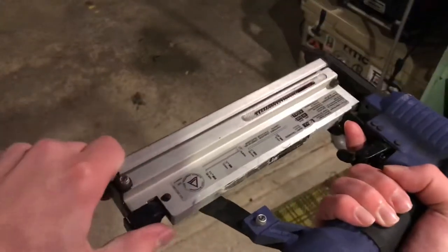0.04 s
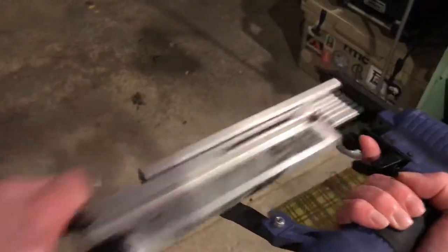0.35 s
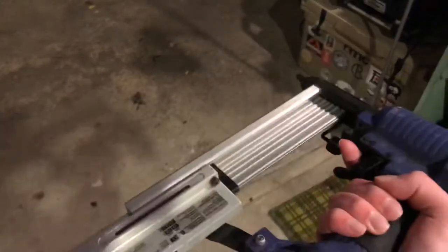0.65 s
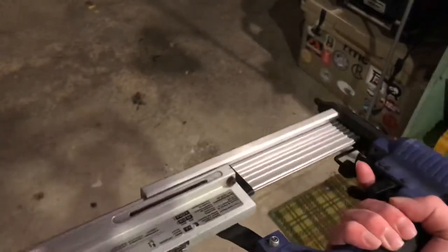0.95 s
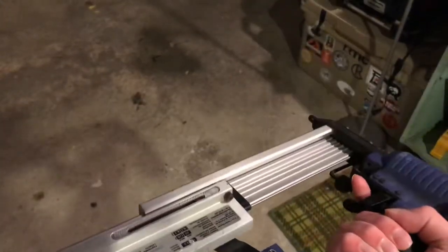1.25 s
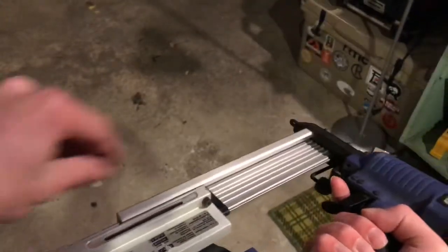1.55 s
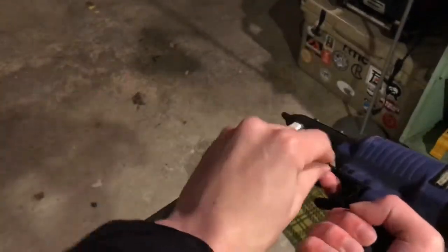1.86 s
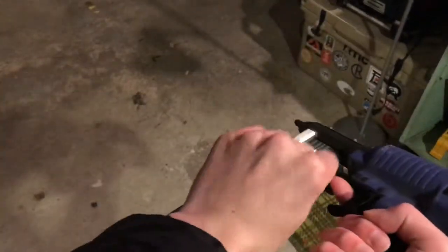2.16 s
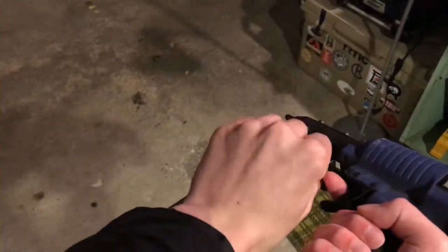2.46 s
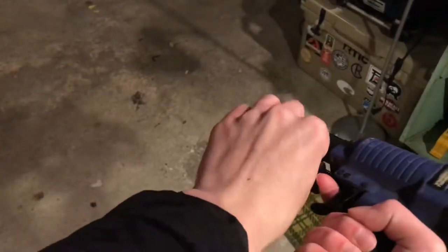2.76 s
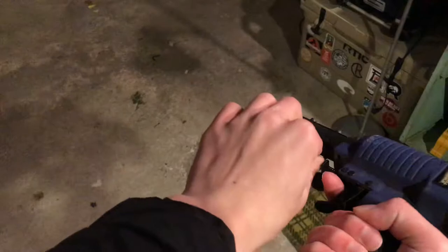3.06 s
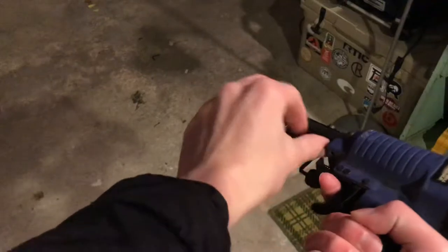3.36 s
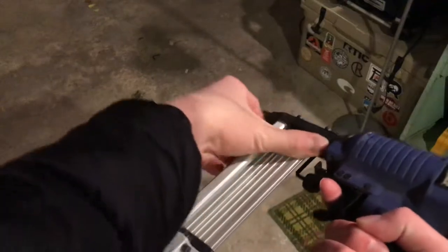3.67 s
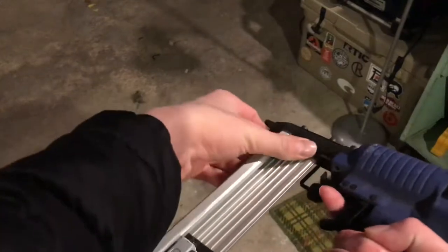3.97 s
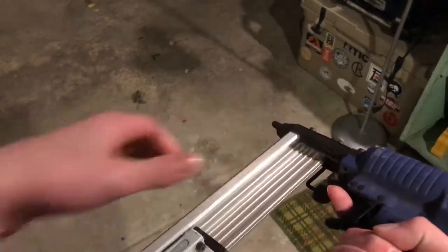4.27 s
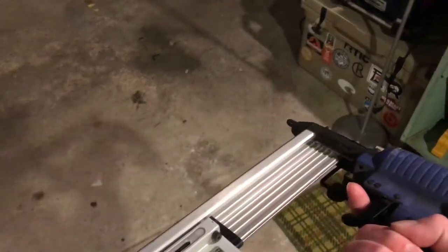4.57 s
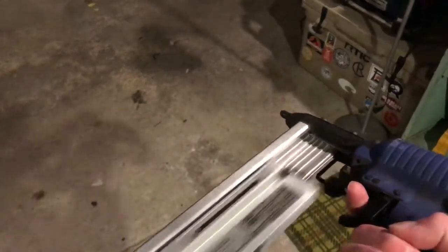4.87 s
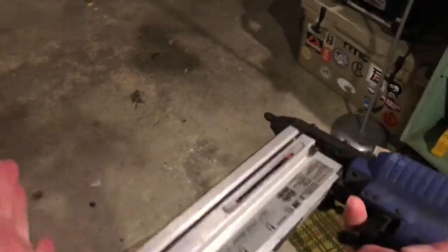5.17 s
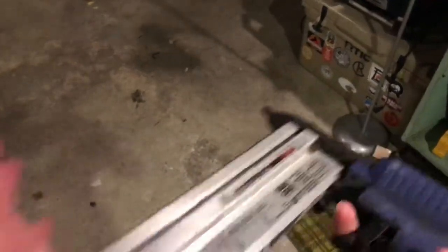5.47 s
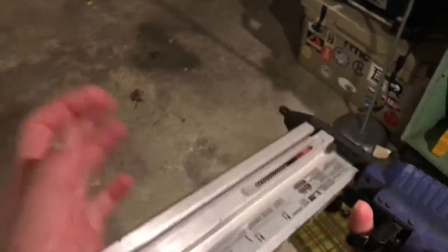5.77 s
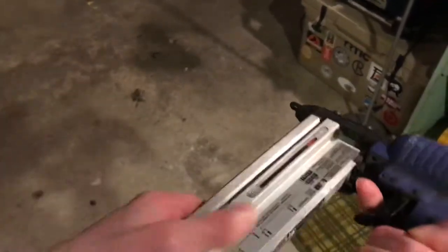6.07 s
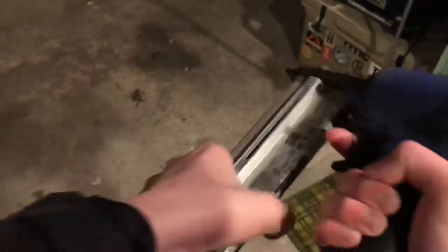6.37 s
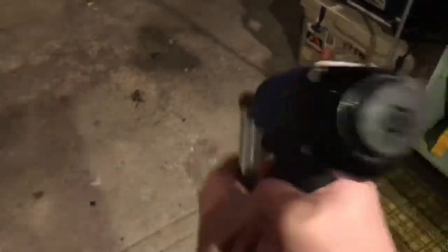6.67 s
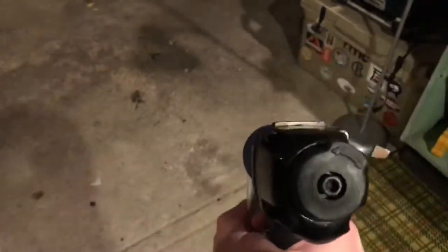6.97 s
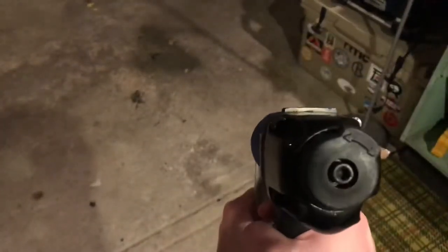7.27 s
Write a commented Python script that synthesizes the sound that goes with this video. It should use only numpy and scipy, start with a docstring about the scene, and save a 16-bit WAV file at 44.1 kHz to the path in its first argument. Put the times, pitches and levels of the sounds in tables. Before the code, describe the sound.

Close up in a concrete workshop, a nail gun's latch clacks and its aluminium magazine slides open with a brief scrape and rattle. A strip of nails ticks and scrapes into the channel while a sleeve rustles faintly. The cover is shoved home with loud metallic clacks and locks with a snap. Soft knocks follow as the plastic body is turned, over a low room rumble.

```python
"""A nail gun is loaded close by in a concrete workshop. The latch clacks and the aluminium magazine
slides open; a sleeve rustles while a strip of nails ticks and scrapes into the channel; the cover is
shoved home and locks with a snap, and the plastic body knocks as the gun is turned round. Impacts and
friction excite the resonances of rail, steel edges, housing and hollow channel; the channel rings
higher the further it stands open. Under it all lies a low room rumble."""
import sys
import numpy as np
from scipy import signal
from scipy.fft import rfft, irfft, next_fast_len
from scipy.io import wavfile
from scipy.ndimage import uniform_filter1d, map_coordinates

SR = 44100
rng = np.random.default_rng(int(sys.argv[2]) if len(sys.argv) > 2 else 0)


def to_wav(s):
    """Save 16-bit WAV."""
    ch = np.atleast_2d(s).T  # columns
    pcm = np.round(np.clip(ch, -1, 1) * 32767)  # PCM
    wavfile.write(sys.argv[1], SR, pcm.astype(np.int16))


N = 327222
HIT_SIZE = 4096  # samples in a contact force or a filter's impulse response
SHUT_HZ, OPEN_HZ = 969, 1524  # the channel's note at the two ends of the cover's travel

# Hard blows of latch and cover: (time [s], delay of seating [s], chatter [s], strike note [Hz],
# base between rail modes [dB], seating gain [dB], channel [dB], rail [dB], edge [dB], thump [dB],
# ring [dB])
HARD_BLOWS = [(.008, .005, .0026, 1222, -4, -1.5, -24.5, -30, -32.5, -56.5, -56),
              (0.293, .0037, 0.0015, 1094, -16.5, 1, -20.5, -22.5, -39.5, -70.5, -52),
              (4.761, .0085, 0.0092, 1553, -3.5, 0, -15.5, -17, -22, -34, -50),
              (4.8954, .004, 0.0044, 1520, -7, -1, -12.5, -12.5, -20, -48.5, -41),
              (5.4016, .0065, 0.0027, 1397, 2.5, -4.5, -19.5, -13.5, -20.5, -31.5, -57)]
# Spectral envelope of the gun's hollow parts: (frequency [Hz], gain [dB])
CAVITY_SPECTRUM = [(250, -30), (620, -13), (900, -8), (1900, 3.5), (4000, -25), (12000, -42)]


def amp(db):
    """Decibels to amplitude ratio."""
    return 10 ** (np.asarray(db) / 20)


def unit(x):
    """Scale to rms 1."""
    return x / np.sqrt(np.mean(x ** 2) + 1e-20)


def dose(x, db):
    """Give a transient the energy of 10 ms at this level."""
    return amp(db) * x / np.sqrt(np.sum(x ** 2) / (SR / 100) + 1e-20)


def along(points, hz):
    """Interpolate (frequency [Hz], value) points on a logarithmic frequency axis."""
    freqs, values = np.transpose(points)
    return np.interp(np.log(hz + 1), np.log(freqs + 1), values)


def add(track, s, sound):
    """Superpose a sound on a track from time s."""
    part = track[max(round(s * SR), 0):][:len(sound)]
    part += sound[:len(part)]


def wobble(rate):
    """A smooth random curve with rate knots a second."""
    return map_coordinates(rng.standard_normal(int(N * rate / SR) + 4), [np.arange(N) * rate / SR])


def coloured(x, gain):
    """Minimum-phase filter: folding the cepstrum makes the given gain curve causal."""
    size = 2 * HIT_SIZE
    cepstrum = irfft(np.log(np.maximum(gain(np.fft.rfftfreq(size, 1 / SR)), 1e-6)))
    cepstrum[1:size // 2] *= 2
    cepstrum[size // 2 + 1:] = 0
    return signal.fftconvolve(x, irfft(np.exp(rfft(cepstrum)))[:HIT_SIZE])[:len(x)]


def shaped(x, spectrum):
    """Filter by a spectral envelope of (frequency [Hz], gain [dB]) points."""
    return coloured(x, lambda hz: amp(along(spectrum, hz)))


def peaks(modes, hz, base_db):
    """Lorentzian resonances (frequency [Hz], bandwidth [Hz], gain [dB]) add in power to a flat base."""
    power = sum(amp(db) ** 2 / (1 + (2 * (hz - centre) / width) ** 2) for centre, width, db in modes)
    return np.sqrt(amp(base_db) ** 2 + power)


def grit(size, spread_db):
    """Dense micro-impacts: noise in grains of log-normal strength."""
    noise = rng.standard_normal(size)
    grains = np.repeat(rng.standard_normal(size // 16 + 1), 16)[:size]
    return unit(noise * amp(spread_db * grains))


def background():
    """Ambient noise: a low rumble with a little hiss, whose level dips briefly at the last snap."""
    spectrum = [(20, -17), (65, 1.5), (200, -5), (310, -5), (550, -16), (1400, -23.5), (2800, -25),
                (16000, -33.5)]  # room noise: (frequency [Hz], gain [dB])
    level_db, dip_db = -64.5, -9.5
    dip_start_s, hold_s, recovery_s = 5.38, .26, .52
    air = unit(shaped(rng.standard_normal(N), spectrum))
    age = np.arange(N) / SR - dip_start_s
    dip = np.clip(age / .1, 0, 1) * np.exp(-np.maximum(age - hold_s, 0) / recovery_s)
    return amp(level_db + dip_db * dip) * air


def chatter(length, t60, fade_db=4):
    """Contact force of two parts that rebound and settle; its flattened spectrum has no pitch."""
    t = np.arange(HIT_SIZE) / SR
    length = max(length, 1e-4)
    envelope = amp(-fade_db * np.minimum(t / length, 1) - 60 * np.maximum(t - length, 0) / t60)
    force = grit(HIT_SIZE, spread_db=2) * envelope
    power = np.abs(uniform_filter1d(np.abs(rfft(force, 2 * HIT_SIZE)) ** 2, size=40))
    return coloured(force, lambda hz: 1 / np.sqrt(power + 1e-12))


def channel(force, modes):
    """Cavity resonance of the air and walls of the nail channel."""
    return coloured(force, lambda hz: amp(along(CAVITY_SPECTRUM, hz)) * peaks(modes, hz, base_db=-33.5))


def channel_note(s):
    """The channel's resonant frequency [Hz] at time s rises with the cover's opening."""
    travel = [(.25, 0), (.293, .15), (.35, .3), (.385, .6), (.415, 0.96), (4.77, 1), (4.8, .52), (4.85, .2),
              (4.895, 0)]  # position of the cover: (time [s], opening [0-1])
    return SHUT_HZ + (OPEN_HZ - SHUT_HZ) * np.interp(s, *np.transpose(travel))


def rail(force, contact_hz, focus_db, base_db=-2.5):
    """Modal response of the aluminium rail; the contact's hardness weights the band at contact_hz."""
    modes = [(2200, 110, -5), (3096, 200, -0.5), (3930, 150, -0.5)]  # rail resonances: (frequency [Hz], bandwidth [Hz], gain [dB])
    spectrum = [(400, -34.5), (1000, -11), (1900, 1.5), (3100, -0.5), (4600, -2.5), (6300, -8.5),
                (10000, -31.5)]  # their envelope: (frequency [Hz], gain [dB])
    focus = lambda hz: amp(focus_db * np.exp(-7 * np.log2((hz + 1) / contact_hz) ** 2))
    return coloured(force, lambda hz: amp(along(spectrum, hz)) * peaks(modes, hz, base_db) * focus(hz))


def edge(force, base_db):
    """The high modes of thin steel edges and nails give a bright click."""
    modes = [(6370, 82, -4.5), (7800, 37, -5), (8590, 93, 1.5), (11450, 80, -1.5), (12690, 300, -6)]  # steel resonances: (frequency [Hz], bandwidth [Hz], gain [dB])
    spectrum = [(2000, -43), (4600, -18.5), (6200, 2.5), (8800, -1.5), (10200, -3), (11500, -2.5)]  # their envelope: (frequency [Hz], gain [dB])
    return coloured(force, lambda hz: amp(along(spectrum, hz)) * peaks(modes, hz, base_db))


def buzz(t60, base_db):
    """Nails and spring shiver against the rail, driving the steel modes with decaying noise."""
    t = np.arange(SR // 2) / SR
    return edge(rng.standard_normal(len(t)) * amp(-60 * t / t60), base_db)


def blow(length, channel_hz, base_db, channel_db, rail_db, edge_db, thump_db):
    """Impact excitation: one force drives channel, rail, edges and body; loose parts rattle on."""
    thump_spectrum = [(40, -23.5), (200, -15), (290, -8.5), (390, 0), (520, -7), (680, 6), (2500, -47)]  # response of the whole gun: (frequency [Hz], gain [dB])
    shiver_t60 = .35  # s
    out = np.zeros(SR)
    force = chatter(length, t60=.026, fade_db=6)
    add(out, 0, dose(channel(force, [(channel_hz, 110, 0)]), channel_db - 3.5))
    add(out, 0, dose(rail(force, 3200, focus_db=1.5, base_db=base_db), rail_db))
    add(out, 0, dose(edge(force, base_db=-.5), edge_db))
    add(out, 0, dose(shaped(force, thump_spectrum), thump_db))
    add(out, 0, dose(buzz(t60=.2, base_db=-2.5), edge_db - 10))
    shiver = grit(SR, spread_db=1.5) * amp(-60 * np.arange(SR) / SR / shiver_t60)
    return out + dose(rail(shiver, 5000, focus_db=4, base_db=9), rail_db - 16.5)


def ringing(db):
    """Free decay of channel and rail; loose contact broadens each mode by a random walk of phase."""
    modes = [(914, -4.5, .7), (965, 0.5, 0.46), (1505, -11, .7), (2170, -0.5, .55), (4190, -9, 0.81)]  # lightly damped modes: (frequency [Hz], relative level [dB], t60 [s])
    linewidth_hz = 30
    t = np.arange(SR) / SR
    ring = np.zeros(SR)
    for hz, mode_db, t60 in modes:
        envelope = amp(mode_db + rng.normal(0, 2) - 60 * t / t60)
        phase = 2 * np.pi * (hz * t + rng.random())
        drift = np.cumsum(rng.standard_normal(SR)) * np.sqrt(2 * np.pi * linewidth_hz / SR)
        ring += envelope * np.sin(phase + drift)
    return amp(db) * ring * (1 - np.exp(-t / .0033))


def clacks():
    """Double impact: latch or cover strikes its stop brightly, seats milliseconds later and rings on."""
    out = np.zeros(N)
    for s, gap, length, strike_hz, base_db, seat_db, *levels in HARD_BLOWS:
        channel_db, rail_db, edge_db, thump_db, ring_db = levels
        strike = blow(length, strike_hz, base_db, channel_db - 2, rail_db - 1.5, edge_db + 2.5, thump_db)
        seating = blow(length, channel_note(s), base_db, channel_db - 3.5, rail_db, edge_db, thump_db)
        add(out, s, strike)
        add(out, s + gap, amp(seat_db) * seating)
        add(out, s + gap, ringing(ring_db))
    return out


def driven_mode(hz, drive_s, t60):
    """A damped oscillator builds up while it is driven, then decays exponentially."""
    t = np.arange(HIT_SIZE) / SR
    decay = amp(-60 * np.maximum(t - drive_s, 0) / t60)
    return np.sin(2 * np.pi * hz * t) * np.minimum(t / drive_s, 1) * decay


def seating_notes():
    """Direct radiation of the channel's main mode as the cover seats."""
    out = np.zeros(N)
    for s, gap, length, _, _, seat_db, channel_db, *_ in HARD_BLOWS:
        note = driven_mode(channel_note(s), length, t60=.028)
        add(out, s + gap, dose(note, channel_db + seat_db - 2.5))
    return out


def slide(stroke, rail_db, edge_db, channel_db, overtone_db):
    """Sliding friction, brighter with effort; the channel's resonance glides as its length changes."""
    bandwidth_hz, overtone_ratios = 85, (1.92, 2.55)
    t = np.arange(stroke[0][0], stroke[-1][0] + .01, 1 / SR)
    level_db = np.interp(t, *np.transpose(stroke))
    phase = 2 * np.pi * np.cumsum(channel_note(t)) / SR
    pole = np.exp(-np.pi * bandwidth_hz / SR)
    friction = lambda: grit(SR, spread_db=4)[:len(t)]

    def resonance(ratio):
        """Narrow-band noise centred on a multiple of the channel's note."""
        baseband = signal.lfilter([1], [1, -pole], friction() + 1j * friction())
        return unit(np.real(baseband * np.exp(1j * ratio * phase)))

    air = amp(channel_db) * unit(shaped(resonance(1), CAVITY_SPECTRUM))
    force = friction()
    brightness = amp(edge_db + .3 * (level_db + 33))  # the edges gain 0.3 dB extra per dB of friction
    rub = amp(rail_db) * unit(rail(force, 3300, focus_db=3)) + brightness * unit(edge(force, base_db=-1))
    envelope = amp(level_db + wobble(130)[:len(t)])
    overtones = amp(overtone_db) * sum(resonance(ratio) for ratio in overtone_ratios)
    out = np.zeros(N)
    add(out, t[0], envelope * (rub + air + overtones))
    return out


def cover_slides():
    """Friction of the cover on its rail, drawn open and later shoved home."""
    # friction during each stroke: (time [s], level [dB])
    open_stroke = [(.25, -54), (.29, -42), (0.315, -33.5), (0.323, -37.5), (0.385, -27.5), (0.419, -33),
                   (0.51, -59)]
    shut_stroke = [(4.78, -18.5), (4.794, -28.5), (4.888, -32.5)]
    opening = slide(open_stroke, rail_db=-5, edge_db=-3.5, channel_db=-6, overtone_db=-9.5)
    closing = slide(shut_stroke, rail_db=-5.5, edge_db=-6, channel_db=-8, overtone_db=-10.5)
    return opening + closing


def ping(force, hz, width_hz):
    """The local resonance of the spot being touched."""
    return coloured(force, lambda freqs: peaks([(hz, width_hz, 0)], freqs, base_db=-40) ** 2)


def tick(length, channel_hz, ping_hz, channel_db, rail_db, ping_db, edge_db):
    """A light impact excites channel, rail, edges and the resonance of the spot it touches."""
    out = np.zeros(SR // 2)
    force = chatter(length, t60=.02)
    cavity = channel(force, [(970, 40, -9), (channel_hz, 95, 0), (channel_hz, 600, -10)])
    add(out, 0, dose(cavity, channel_db))
    add(out, 0, dose(rail(force, ping_hz, focus_db=5.5), rail_db))
    add(out, 0, dose(edge(force, base_db=-5), edge_db))
    add(out, 0, dose(ping(chatter(length, t60=.012), ping_hz, width_hz=420), ping_db))
    return out + dose(buzz(t60=.15, base_db=-6.5), edge_db - 9)


def rattles():
    """Loose cover and latch touch the channel; the point of contact selects the modes that sound."""
    # light contacts: (time [s], chatter [s], channel note [Hz], ping [Hz], level [dB],
    # ping level [dB], brightness [dB])
    contacts = [(.2654, .002, 1470, 3980, -50, -54, -4.5), (.534, 0.0012, 1900, 4430, -38, -53, -.5),
                (.565, 0.0069, 1530, 3650, -40.5, -57, -40), (.5864, 0.0043, 1336, 1950, -33.5, -35, -10.5),
                (.642, .0007, 1620, 2680, -41, -41.5, -22), (.729, .004, 1660, 3370, -51.5, -51.5, -16),
                (.896, 0.013, 1570, 1700, -46, -45, -7), (.913, 0.0022, 1400, 3530, -43.5, -52, -12),
                (.9224, 0.004, 1460, 1630, -35, -35, -8.5), (3.6632, 0.0029, 2640, 4350, -43, -40, -2),
                (3.8549, .003, 2160, 4600, -50, -54, -3.5), (4.755, .003, 1484, 3590, -30, -40, -0.5),
                (5.38, .002, 1960, 2380, -38, -43, 0), (5.392, 0.007, 1286, 3130, -33.5, -43.5, -4.5),
                (5.61, .057, 1800, 4790, -56.5, -63, -9), (6.597, .003, 1750, 2450, -40.5, -41, -12.5),
                (6.628, .008, 2202, 3900, -44.5, -45, 1.5)]
    out = np.zeros(N)
    for s, length, hz, ping_hz, db, ping_db, bright_db in contacts:
        channel_db = db - 2 - .18 * bright_db
        rail_db = db - 1.5 + .25 * bright_db
        add(out, s, tick(length, hz, ping_hz, channel_db, rail_db, ping_db, edge_db=db + bright_db))
    return out


def movements(rows, attack_s=.16, t60=.72):
    """Envelopes of movements, and of a steady hiss, rise, hold and decay; being incoherent, they add in power."""
    t = np.arange(N) / SR
    power = np.zeros(N)
    for s, length, db in rows:
        rise = np.clip((t - s) / attack_s, 0, 1)
        power += (rise * amp(db - 60 * np.clip((t - s - length) / t60, 0, 2))) ** 2
    return np.sqrt(power)


def housing(force):
    """The damped modes of the plastic housing give a dull tone."""
    modes = [(820, 140, 4.5), (950, 69, 5.5), (1440, 350, -10.5)]  # housing resonances: (frequency [Hz], bandwidth [Hz], gain [dB])
    return coloured(force, lambda hz: peaks(modes, hz, base_db=-53) * amp(along(CAVITY_SPECTRUM, hz)))


def handling():
    """Friction noise of the sleeve and of the palm on the housing, over a faint steady hiss; a low rumble as
    the gun sways."""
    cloth_spectrum = [(290, -28), (500, -8.5), (1100, -7), (4150, -8), (5300, -12), (15000, -17.5)]  # rustling fabric: (frequency [Hz], gain [dB])
    # movements of arm, palm and the gun's weight, plus one long row of steady faint hiss that fades out at
    # about the last snap: (time [s], duration [s], level [dB])
    rustles = [(.68, .27, -65.5), (.9, 4.3, -69.5), (1.3, 0.61, -66.5), (3.2, 0.53, -63.5),
               (3.95, 0.36, -61.5), (4.35, 0.29, -65), (5.2, 0.251, -64.5), (5.86, 0.41, -62),
               (6.2, 0.47, -59.5)]
    rubs = [(3.45, 0.25, -66.5), (3.93, 0.089, -64), (4.27, 0.23, -59), (4.64, .12, -55), (5.9, 0.28, -69)]
    sway = (3.6, 0.94, -65)
    cloth = unit(shaped(grit(N, spread_db=3), cloth_spectrum))
    palm = unit(housing(grit(N, spread_db=3)))
    low_band = signal.butter(2, [42, 110], "bandpass", fs=SR, output="sos")
    rumble = unit(signal.sosfilt(low_band, rng.standard_normal(N)))
    sleeve = movements(rustles) * amp(wobble(25)) * cloth
    grip = movements(rubs) * amp(wobble(43)) * palm
    return sleeve + grip + movements([sway]) * rumble


def strip_scrapes():
    """Stick-slip friction of the nail strip: the channel gives one note, the contact a shifting rasp."""
    pushes = [(1.895, 0.017, -54.5, 2980), (2.026, .02, -57.5, 3430), (2.126, 0.039, -50, 5460),
              (2.157, 0.022, -46.5, 4400), (2.616, 0.047, -53, 3580), (2.966, 0.091, -57.5, 5200),
              (3.269, 0.034, -54.5, 4720)]  # drags along the groove: (time [s], duration [s], level [dB], rasp [Hz])
    attack_s, t60 = .014, .22
    out = np.zeros(N)
    t = np.arange(SR // 2) / SR
    for s, length, db, rasp_hz in pushes:
        force = grit(len(t), spread_db=3.5)
        note = unit(channel(force, [(1510, 53, 5.5), (1640, 160, -5)]))
        rasp = amp(-9) * unit(rail(force, rasp_hz, focus_db=-4))
        rasp += amp(-14) * unit(ping(force, rasp_hz, width_hz=700))
        rasp += amp(-13.5) * unit(edge(force, base_db=-13))
        envelope = np.minimum(t / attack_s, 1) * amp(db - 60 * np.maximum(t - length, 0) / t60)
        add(out, s, envelope * (note + rasp))
    return out * amp(1.2 * wobble(70))


def strip_taps():
    """Impacts of the nail strip on the open channel; harder contacts excite more of the rail."""
    # taps of the strip: (time [s], chatter [s], ping [Hz], level [dB], brightness [dB])
    taps = [(1.897, .026, 2980, -44, -16.5), (2.166, 0.028, 3540, -41, -8.5),
            (2.2032, 0.0027, 6300, -53.5, 5.5), (2.397, 0.01, 4030, -36, -24),
            (2.4197, 0.0065, 3430, -37.5, -27), (2.633, 0.0014, 4100, -44, -30),
            (2.669, .01, 4400, -52, -14), (2.7607, 0.0018, 2060, -44.5, -27),
            (3.0056, .006, 3540, -45.5, -12), (3.018, 0.0017, 4960, -47, -12),
            (3.521, .001, 3600, -38, -14.5)]
    drop_s = 2.3971  # the strip falls into its groove and its steel rings
    out = np.zeros(N)
    for s, length, ping_hz, db, bright_db in taps:
        metal_db = db + .48 * bright_db
        add(out, s, tick(length, OPEN_HZ, ping_hz, channel_db=db - 6.5 - .17 * bright_db,
                         rail_db=metal_db - 2, ping_db=metal_db - 4, edge_db=db + bright_db))
    add(out, drop_s, dose(edge(chatter(.0029, t60=.02), base_db=-7), db=-35))
    add(out, drop_s, dose(buzz(t60=.21, base_db=-10), db=-39.5))
    return out


def jolts():
    """Damped oscillation of the gun's mass in the hand: a thud as the cover is shoved and as it locks."""
    thuds = [(4.755, 0.018, -34), (5.4, .01, -48.5)]  # bounces of the gun: (time [s], build-up [s], level [dB])
    bounce_hz = 69.7
    out = np.zeros(N)
    for s, drive_s, db in thuds:
        add(out, s, dose(driven_mode(bounce_hz, drive_s, t60=.071), db))
    return out


def body_knocks():
    """The hand shifts on the gun; each impact excites the housing and its loose metal fittings."""
    knocks = [(5.093, -49, -16), (5.738, -57.5, -34), (6.031, -55, -28), (6.139, -51.5, -28),
              (6.442, -53.5, 2.5), (6.578, -50, -8), (6.589, -42.5, -15), (6.708, -52, -22)]  # knocks of the plastic body: (time [s], level [dB], brightness [dB])
    out = np.zeros(N)
    for s, db, bright_db in knocks:
        force = chatter(length=.0035, t60=.018)
        add(out, s, dose(housing(force), db))
        add(out, s, dose(rail(force, contact_hz=2780, focus_db=11.5), db - 2.5 + .4 * bright_db))
        add(out, s, dose(edge(force, base_db=-12), db + bright_db))
    return out


def diffused(tail):
    """Scattering by clutter evens out the room's response, so that it favours no single note."""
    spectrum = rfft(tail, 2 * len(tail))
    power = np.abs(spectrum) ** 2
    evenness = np.abs(uniform_filter1d(power, size=1200) / uniform_filter1d(power, size=50))
    return irfft(spectrum * np.sqrt(evenness))[:len(tail)]


def workshop(x, wet_db):
    """Direct sound plus diffuse reverberation from floor and walls; the treble is absorbed first."""
    decay_times = [(150, 0.51), (900, .48), (4200, 0.42), (8000, 0.18), (15000, 0.047)]  # reverberation time: (frequency [Hz], t60 [s])
    hz, t, bands = signal.stft(rng.standard_normal(SR), SR, nperseg=256)
    tail = signal.istft(bands * amp(-60 * t / along(decay_times, hz)[:, None]), SR, nperseg=256)[1]
    age = np.arange(len(tail)) / SR
    onset = 1 - np.exp(-(age / .0057) ** 2)
    early_boost = 1 + 2 * np.exp(-age / .03)  # near surfaces reflect first and strongest
    tail = diffused(tail * onset * early_boost)
    return x + amp(wet_db) * signal.fftconvolve(x, tail / np.linalg.norm(tail))[:N]


def scene():
    """Superposition of the gun's reverberant sounds, its direct sounds and the background."""
    slides = cover_slides()
    magazine = workshop(clacks() + rattles() + slides, wet_db=-17)
    strip_and_body = workshop(strip_taps() + strip_scrapes() + body_knocks(), wet_db=-14)
    return (magazine + strip_and_body + seating_notes() + jolts() + handling() + background())[None]


def record(dry):
    """Soft saturation rounds the peaks, and a steep low-pass limits the bandwidth."""
    ceiling, cutoff_hz = .9, 16000
    rounded = dry / (1 + np.abs(dry / ceiling) ** 6) ** (1 / 6)
    size = next_fast_len(N + HIT_SIZE)
    lowpass = 1 / (1 + (np.fft.rfftfreq(size, 1 / SR) / cutoff_hz) ** 120)
    return irfft(rfft(rounded, size) * lowpass, size)[:, :N]


dry = scene()
out = record(dry)
to_wav(out)
```